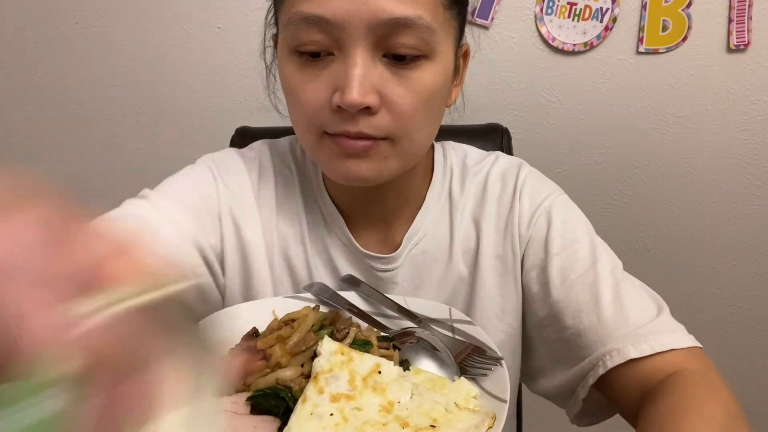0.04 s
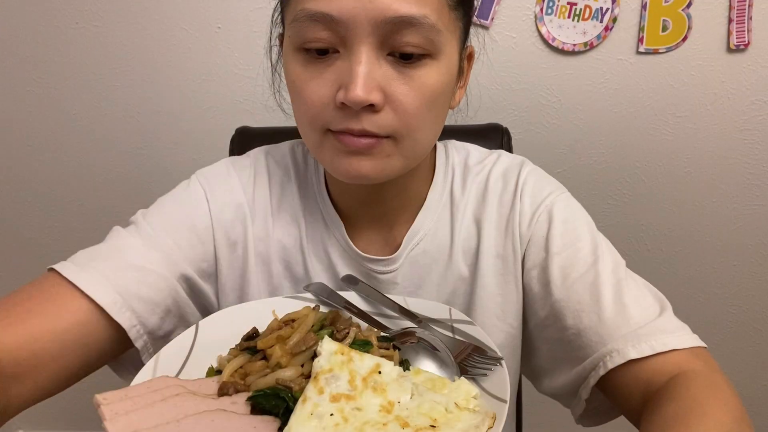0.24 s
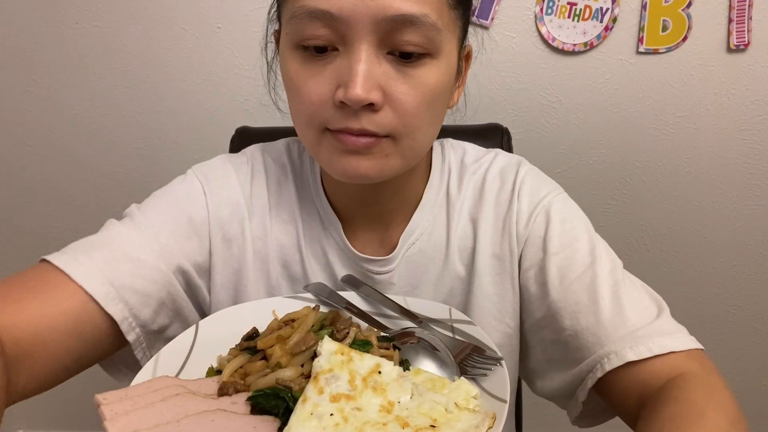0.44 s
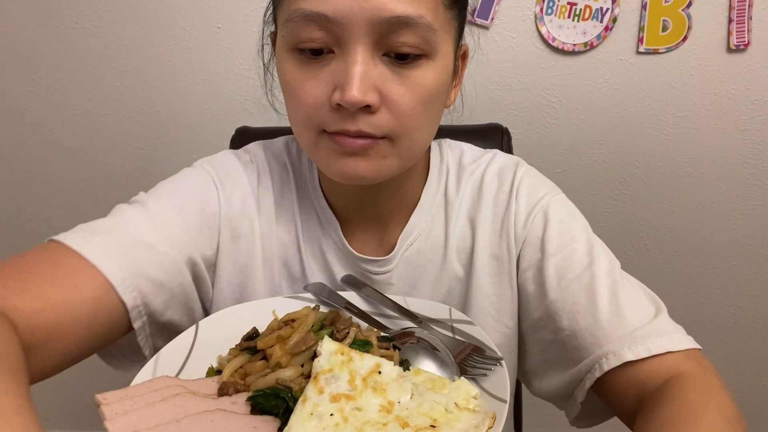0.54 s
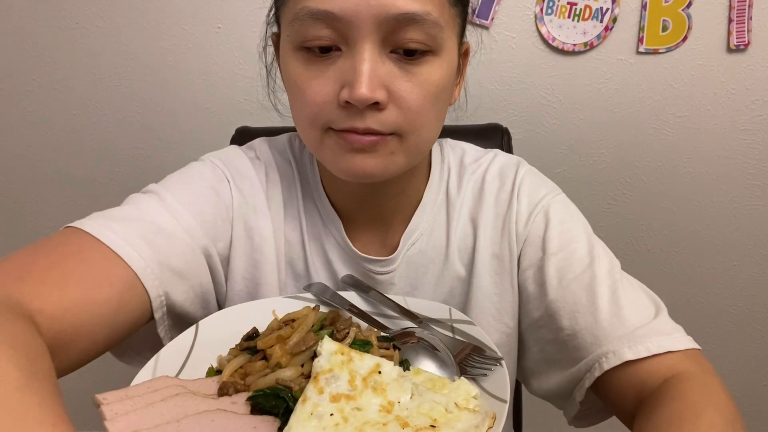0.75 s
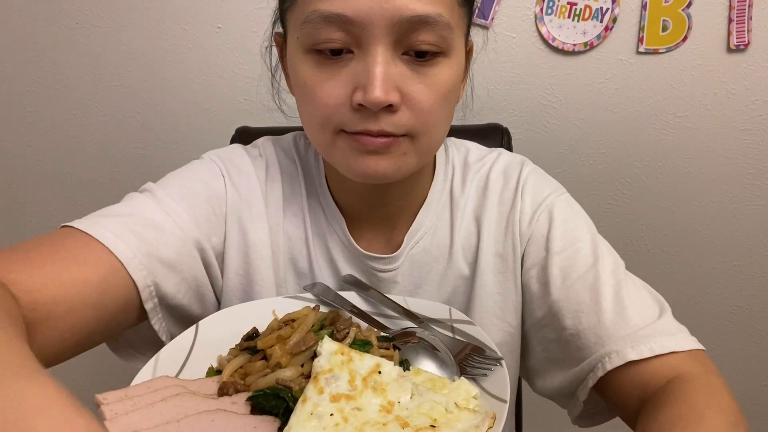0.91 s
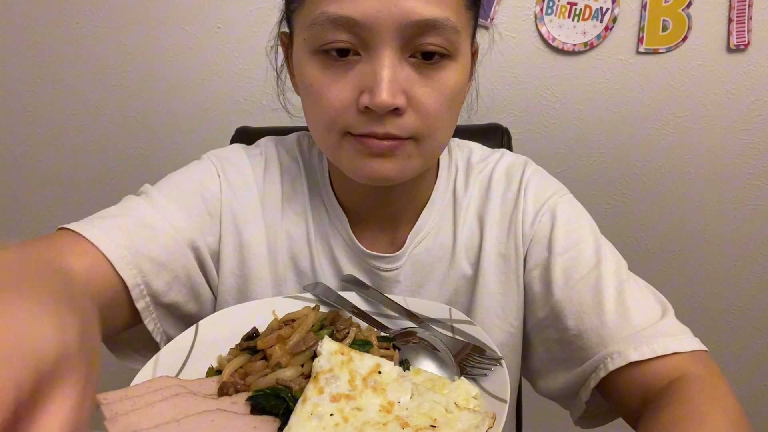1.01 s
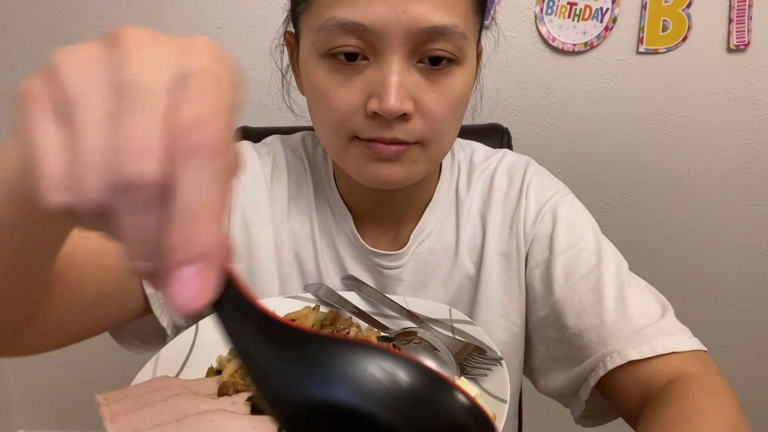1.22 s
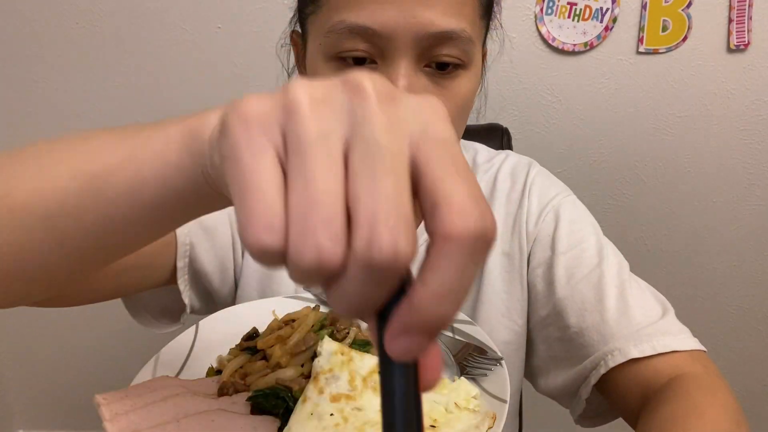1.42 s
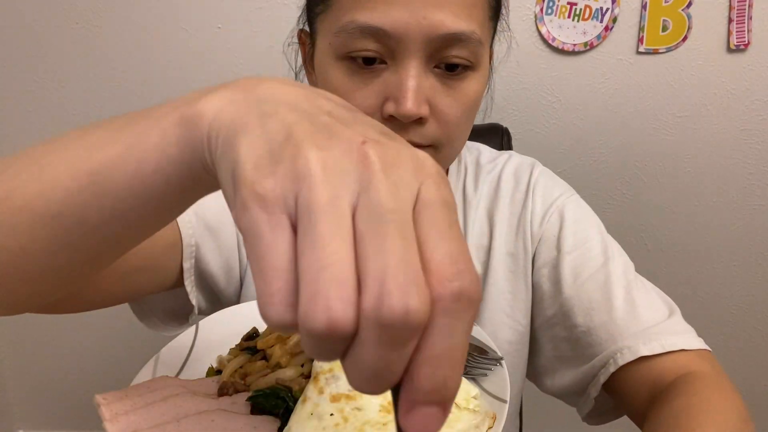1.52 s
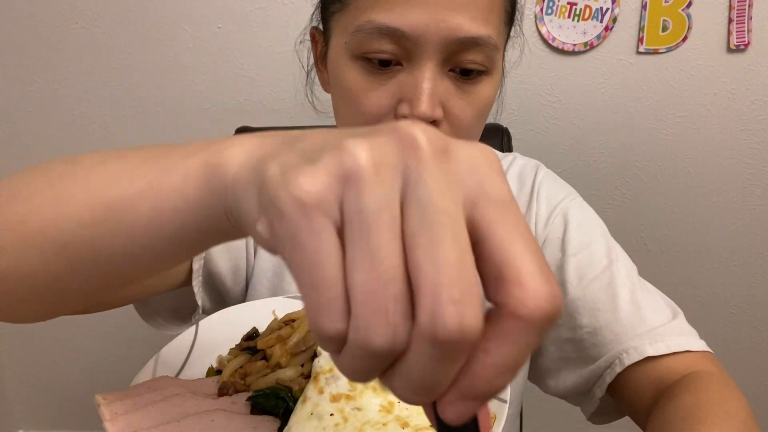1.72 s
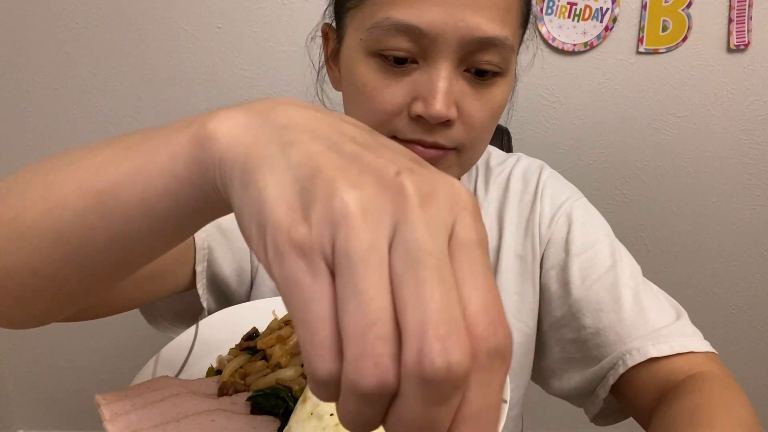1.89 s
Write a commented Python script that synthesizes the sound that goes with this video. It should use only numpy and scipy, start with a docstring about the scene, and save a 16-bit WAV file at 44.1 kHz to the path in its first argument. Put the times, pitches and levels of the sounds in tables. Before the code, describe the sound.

Tableware clatter: a plate set down, followed by a spoon's close knock and ringing clink.

```python
"""A low rumble and a faint hiss fill a small live room. To one side a dish is set on the dining table: it
clatters and settles with a thud. An arm bumps the table softly and a sleeve brushes it. A hard spoon grazes the
china as it is picked up, knocks on it close to the microphone, ticks twice as it slides, and lands again with a
clink, the table taking its weight with a low thump. Each hard contact is a short crack plus damped modes,
answered by the room; the china rings on after the knock and the clink."""
import sys
import numpy as np
from scipy import signal
from scipy.fft import rfft, irfft, next_fast_len
from scipy.io import wavfile
from scipy.ndimage import map_coordinates

SR = 44100
rng = np.random.default_rng(int(sys.argv[2]) if len(sys.argv) > 2 else 0)


def put_to_file(sound):
    """Save the sound as 16-bit audio at rate SR, in the file named by the first command-line argument."""
    columns = np.atleast_2d(sound).T  # one column per channel
    safe = np.clip(columns, -1, 1)
    whole_steps = np.round(safe * 32767)
    wavfile.write(sys.argv[1], SR, whole_steps.astype(np.int16))


N = 85995


def amp(db):
    """Decibels to gain."""
    return 10 ** (np.asarray(db) / 20)


def unit_rms(x):
    """Scale to rms 1."""
    return x / np.sqrt(np.mean(x ** 2) + 1e-20)


def curve_at(points, hz):
    """Interpolate (freq_hz, value) points on a log frequency axis."""
    freqs, values = np.transpose(points)
    return np.interp(np.log(hz + 1), np.log(freqs + 1), values)


def noise(spectrum, size):
    """Two independent coloured noises of rms 1."""
    n_fft = next_fast_len(size + 8192)
    gain = amp(curve_at(spectrum, np.fft.rfftfreq(n_fft, 1 / SR)))
    white = rng.standard_normal((2, n_fft))
    return unit_rms(irfft(rfft(white) * gain, n_fft)[:, :size])


def widen(pair, correlation):
    """Mix two noises to a left-right correlation, clipped to +-1."""
    angle = np.arccos(np.clip(correlation, -1, 1)) / 2
    return np.cos(angle) * pair[0] + np.sin(angle) * np.array([pair[1], -pair[1]])


def pan(db):
    """Stereo gains, left over right by db."""
    return amp(np.array([[db], [-db]]) / 2)


def add(track, start_s, sound):
    """Mix a sound in at start_s."""
    part = track[:, round(start_s * SR):][:, :sound.shape[1]]
    part += sound[:, :part.shape[1]]


def swell(centre_s, width_s):
    """Gaussian envelope of peak 1."""
    return np.exp(-.5 * ((np.arange(N) / SR - centre_s) / width_s) ** 2)


def wobble(knots_per_s):
    """Smooth random curve."""
    knots = rng.standard_normal(int(N * knots_per_s / SR) + 4)
    return map_coordinates(knots, [np.arange(N) * knots_per_s / SR])


def low_cut(x, hz):
    """Fourth-order high-pass."""
    return signal.sosfilt(signal.butter(4, hz, "highpass", fs=SR, output="sos"), x)


def tuned(pitches_hz, rows):
    """Prefix each mode's row with its pitch."""
    return [(hz, *row) for hz, row in zip(pitches_hz, rows)]


def ring(modes, lag_s):
    """Damped modes that start together; the left channel's phase trails the right by lag_s."""
    t = np.arange(SR * 3 // 4) / SR
    scatter_cycles, attack_s = 0.12, 0.0005
    sound = np.zeros((2, len(t)))
    for hz, db, t60_s, pan_db in modes:
        phase = hz * lag_s * np.array([[-.5], [.5]]) + scatter_cycles * rng.standard_normal((2, 1))
        sound += pan(pan_db) * amp(db - 60 * t / t60_s) * np.cos(2 * np.pi * (hz * t + phase))
    return sound * np.minimum(t / attack_s, 1)


# freq_hz, t60_s
ROOM_DECAY = [(100, 0.66), (500, 0.4), (2000, 0.36), (5000, 0.39), (9000, 0.28), (14000, 0.28)]
# freq_hz, correlation
ROOM_STEREO = [(100, .95), (300, .7), (700, -1.3), (2000, -.1), (6000, 0.49), (9000, 0.94), (13000, .7)]
ROOM_BUILD_S, REFLECTIONS_DB = 0.011, -10


def in_room(sound, tail_db):
    """Direct sound, eight reflections a side from table and walls, and a diffuse tail."""
    hz, t, bands = signal.stft(rng.standard_normal((2, SR * 3 // 4)), SR, nperseg=256)
    bands = widen(bands, curve_at(ROOM_STEREO, hz)[:, None])
    decay = amp(-60 * t / curve_at(ROOM_DECAY, hz)[:, None])
    tail = signal.istft(bands * decay, SR, nperseg=256)[1]
    tail *= 1 - np.exp(-np.arange(tail.shape[1]) / SR / ROOM_BUILD_S)
    reflections = np.zeros_like(tail)
    for side in reflections:
        side[rng.integers(SR // 600, SR // 60, size=8)] = rng.choice([-1, 1], size=8) / np.sqrt(8)
    response = amp(tail_db) * tail / np.linalg.norm(tail[0]) + amp(REFLECTIONS_DB) * reflections
    response[:, 0] += 1  # direct path
    return signal.fftconvolve(sound, response, axes=1)


def strikes(hits, modes, crack_spectrum, lag_s, crack_db, crack_t60_s, tail_db):
    """Each contact is a noise crack and a ring of the modes, answered by the room."""
    track = np.zeros((2, N))
    for start_s, db in hits:
        body = ring(modes, lag_s)
        t = np.arange(body.shape[1]) / SR
        crack = amp(crack_db - 60 * t / crack_t60_s) * noise(crack_spectrum, len(t))
        add(track, start_s, amp(db) * in_room(body + crack, tail_db))
    return track


# freq_hz, gain_db
RUMBLE_SPECTRUM = [(15, -27.5), (25, -12), (59, 4.5), (134, -4.5), (168, 3), (197, -6.5), (413, -18),
                   (447, -20), (1060, -21.5), (1680, -28.5), (3000, -30), (3900, -56.5), (6600, -120)]
# freq_hz, gain_db
HISS_SPECTRUM = [(1500, -15.5), (3300, -7.5), (5000, -5), (6400, -7.5), (7200, 6.5), (8000, 3), (8700, -1),
                 (9900, -6), (11800, 1), (13000, 1), (14300, -2), (16000, -16)]
# time_s, level_db
HISS_LEVELS = [(0, -73.5), (0.531, -82.5), (.58, -71.5), (1.3, -68.5), (1.821, -66), (1.88, -80)]
RUMBLE_DB, HISS_WOBBLE_DB = -64, 1


def background():
    """Low room rumble and a faint, wavering hiss."""
    rumble = noise(RUMBLE_SPECTRUM + [(6000, -53)], N)  # flat floor above 6 kHz
    rumble = amp(RUMBLE_DB) * widen(rumble, correlation=0.8) * pan(db=-6.5)
    hiss = widen(noise(HISS_SPECTRUM, N), correlation=0.76)
    hiss_db = np.interp(np.arange(N) / SR, *np.transpose(HISS_LEVELS))
    hiss_db += HISS_WOBBLE_DB * wobble(knots_per_s=16)
    return rumble + amp(hiss_db) * hiss


# centre_s, width_s, level_db, pitch_hz
SPOON_GRAZES = [(.64, 0.044, -74, 4303), (1.14, 0.1, -79.5, 3300), (1.294, 0.041, -71, 4200)]
GRAZE_BANDWIDTH_HZ = 35


def grazes():
    """Each light rub of the spoon feeds one narrow resonance of the china."""
    track = np.zeros((2, N))
    for centre_s, width_s, db, hz in SPOON_GRAZES:
        resonator = signal.iirpeak(hz, hz / GRAZE_BANDWIDTH_HZ, fs=SR)
        tone = unit_rms(signal.lfilter(*resonator, rng.standard_normal((2, N))))
        track += amp(db) * swell(centre_s, width_s) * widen(tone, correlation=0.2)
    return track


# freq_hz, gain_db
SLEEVE_SPECTRUM = [(60, 3), (200, 2), (700, -7), (1300, -21.5), (5000, -38)]
# start_s, level_db, pitch_hz, t60_s; the first three are the arm, the last is the table taking the spoon's
# weight at the clink
TABLE_BUMPS = [(0.533, -53, 47, 0.5), (0.614, -50, 134, .2), (0.696, -43.5, 126, 0.14),
               (1.592, -47, 118.6, 0.13)]
SLEEVE_DB, BUMP_ATTACK_S = -53.5, 0.0013


def arm():
    """A sleeve brushes the table; each soft bump of the arm, and the table taking the spoon's weight at the
    clink, rings one low mode."""
    t = np.arange(N) / SR
    cloth = widen(noise(SLEEVE_SPECTRUM, N), correlation=0.38)
    track = amp(SLEEVE_DB) * swell(centre_s=0.669, width_s=0.024) * cloth
    attack = 1 - np.exp(-t / BUMP_ATTACK_S)
    for start_s, db, hz, t60_s in TABLE_BUMPS:
        bump = attack * amp(db - 60 * t / t60_s) * np.sin(2 * np.pi * hz * t)
        add(track, start_s, bump[None])
    return track * pan(db=-3.5)


# start_s, level_db
THUD_HITS = [(0.219, -32.5), (0.3085, -33), (0.319, -49.5), (0.349, -37)]
# pitch_hz, level_db, t60_s, pan_db
TABLETOP_MODES = [(124, -5.5, 0.13, -1), (186.5, -2.5, 0.1, -0.5), (288.5, -3, .08, -4.5),
                  (362.2, -4, 0.1, -0.5), (563, 0, 0.068, 1.5), (704, 4, 0.02, -5)]
# freq_hz, gain_db
THUD_SPECTRUM = [(50, -7), (120, 5), (700, -10.5), (1500, -2), (5000, -49)]
# start_s, level_db
CLATTER_HITS = [(0.2194, -23), (0.2222, -23), (0.2260, -23), (0.2310, -30), (0.2935, -35), (0.3080, -42),
                (0.3180, -31)]
# pitch_hz
DISH_PITCHES_HZ = [890, 955, 1450, 1980, 2095, 2185, 2260, 2400, 2860, 4120, 6600, 9030]
# level_db, t60_s, pan_db
DISH_MODES = [(-2, 0.04, 0), (-6.5, 0.049, -2.5), (-8, 0.0088, 1), (-5, 0.043, -2.5), (-4.5, 0.033, 15.5),
              (-2, 0.054, -2.5), (-1, .06, 0.5), (-8, .05, -3.5), (-8.5, 0.037, 3), (-2, .025, -0.5),
              (-6.5, .025, -6.5), (-2, 0.029, 0.5)]
# freq_hz, gain_db
CLATTER_SPECTRUM = [(150, -11.5), (400, -6.5), (800, -4.5), (1200, 2.5), (1700, -1), (2300, 3),
                    (3400, -1.5), (4600, 2.5), (6500, -3.5), (7600, -0.5), (9200, -11.5), (12000, -11),
                    (15000, -22.5)]
DISH_DETUNE, DISH_LAG_S = 0.0062, -0.00029


def dish():
    """The dish thuds into the table top and clatters, its modes shifting a little with each contact."""
    track = strikes(THUD_HITS, TABLETOP_MODES, THUD_SPECTRUM, DISH_LAG_S,
                    crack_db=3, crack_t60_s=0.05, tail_db=-13.5)
    for hit in CLATTER_HITS:
        pitches_hz = DISH_PITCHES_HZ * (1 + DISH_DETUNE * rng.standard_normal(len(DISH_PITCHES_HZ)))
        track += strikes([hit], tuned(pitches_hz, DISH_MODES), CLATTER_SPECTRUM, DISH_LAG_S,
                         crack_db=5.5, crack_t60_s=0.018, tail_db=-4)
    return low_cut(track, hz=95) * pan(db=-0.6)


# pitch_hz; the lowest two beat
CHINA_PITCHES_HZ = [1976, 1991, 2224, 2390, 3268, 3712, 3736, 3967, 5083, 5627, 6878, 7487, 8955]
# t60_s, knock_level_db, clink_level_db
CHINA_MODES = [(0.32, -40, -23.5), (0.33, -52, -30.5), (0.43, -69, -32), (0.27, -42.5, -48),
               (0.2, -67, -32.5), (0.3, -39, -58), (0.12, -53.5, -36), (0.1, -43, -52), (0.093, -77, -29),
               (.26, -58.5, -41.5), (0.2, -66.5, -43), (0.079, -56.5, -40.5), (.14, -57, -44)]
SPOON_LAG_S = 0.00026


def china():
    """The china's long modes ring on; where the spoon lands decides which ones speak."""
    track = np.zeros((2, N))
    for landing, (start_s, _) in enumerate([KNOCK_HITS[0], CLINK_HITS[0]]):
        modes = [(hz, levels_db[landing], t60_s, 0)
                 for hz, t60_s, *levels_db in tuned(CHINA_PITCHES_HZ, CHINA_MODES)]
        add(track, start_s, in_room(ring(modes, SPOON_LAG_S), tail_db=-2.5))
    return track * pan(db=0.5)


# start_s, level_db
KNOCK_HITS = [(1.3457, -22.5), (1.3480, -27.5)]
# pitch_hz
KNOCK_PITCHES_HZ = [635, 715, 1400, 1997, 2420, 2900, 3640, 4330, 6120, 7420, 7950, 9620, 11100, 11950,
                    14550]
# level_db, t60_s, pan_db
KNOCK_MODES = [(-17.5, 0.16, -10), (0, 0.028, 2), (-1, 0.012, -9), (0.5, 0.052, 2), (2.5, 0.023, -1.5),
               (0.5, 0.012, -5.5), (-4, 0.045, -11.5), (-6.5, 0.015, -6.5), (-7.5, 0.018, -1.5),
               (-5, 0.01, -11), (-7, 0.042, 5), (-7.5, 0.028, -0.5), (-16.5, 0.0067, 3), (3, 0.022, 1.5),
               (-5, .02, 9.5)]
# freq_hz, gain_db
KNOCK_SPECTRUM = [(200, -48), (450, -12), (700, -12), (1500, 2.5), (3500, 1), (5100, -25), (6500, -6),
                  (9000, -13), (15000, -17)]
# start_s, level_db
TICK_HITS = [(1.3702, -44.5), (1.3882, -42)]
# pitch_hz, level_db, t60_s, pan_db
TICK_MODES = [(7130, -6.5, 0.1, 0.0051), (8000, 0, 0.026, 0.043), (8800, -1, 0.033, 0.0046),
              (12200, -12.5, 0.028, 0)]
# freq_hz, gain_db
TICK_SPECTRUM = [(2000, -12.5), (5200, -20), (7600, 5), (9000, -10.5), (12000, -15.5), (15000, -13.5)]
# start_s, level_db
CLINK_HITS = [(1.5881, -17.5)]
# pitch_hz
CLINK_PITCHES_HZ = [820, 1984, 3567, 5215, 6620, 8030, 8810, 9100, 12000, 13300]
# level_db, t60_s, pan_db
CLINK_MODES = [(-19.5, 0.044, -7), (-1.5, 0.13, -5), (-8, 0.054, -5), (-6, 0.06, -3.5), (-12, 0.04, -7),
               (-10.5, 0.029, -2.5), (0.5, 0.013, -8.5), (-9.5, 0.067, 10), (-11, 0.031, 7.5),
               (-24, 0.027, 1)]
# freq_hz, gain_db
CLINK_SPECTRUM = [(200, -24.5), (600, -7.5), (1200, -7), (2500, 2.5), (5000, 2), (8500, 11.5), (11000, -31),
                  (13500, 5.5), (16000, -4)]


def spoon():
    """A dull knock with a rebound, two ticks, a bright clink; the spoon is too small to radiate bass."""
    knock = strikes(KNOCK_HITS, tuned(KNOCK_PITCHES_HZ, KNOCK_MODES), KNOCK_SPECTRUM, SPOON_LAG_S,
                    crack_db=-1.5, crack_t60_s=0.015, tail_db=-13)
    ticks = strikes(TICK_HITS, TICK_MODES, TICK_SPECTRUM, SPOON_LAG_S,
                    crack_db=3.5, crack_t60_s=0.025, tail_db=-13)
    clink = strikes(CLINK_HITS, tuned(CLINK_PITCHES_HZ, CLINK_MODES), CLINK_SPECTRUM, SPOON_LAG_S,
                    crack_db=3, crack_t60_s=0.014, tail_db=-14.5)
    return low_cut(knock + ticks + clink, hz=520) * pan(db=-2.16)


def scene():
    """Everything at the table, over the background."""
    return dish() + arm() + spoon() + china() + background() + grazes()


# freq_hz, gain_db
MIC_ROLLOFF = [(13000, -1.5), (14400, -4), (15600, -13.5), (16600, -18.5)]
BAND_LIMIT_HZ = 16700


def record(dry):
    """The microphone's treble roll-off and band limit."""
    n_fft = next_fast_len(N + SR // 2)
    hz = np.fft.rfftfreq(n_fft, 1 / SR)
    gain = amp(curve_at(MIC_ROLLOFF, hz)) * (hz < BAND_LIMIT_HZ)
    return irfft(rfft(dry, n_fft) * gain, n_fft)[:, :N]


dry = scene()
out = record(dry)
put_to_file(out)
```